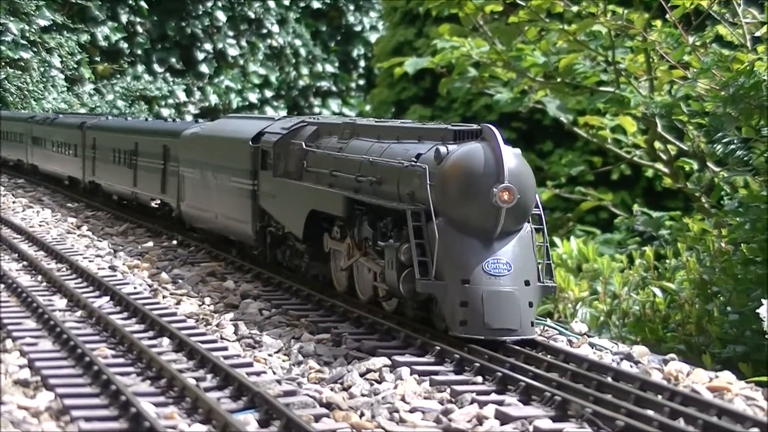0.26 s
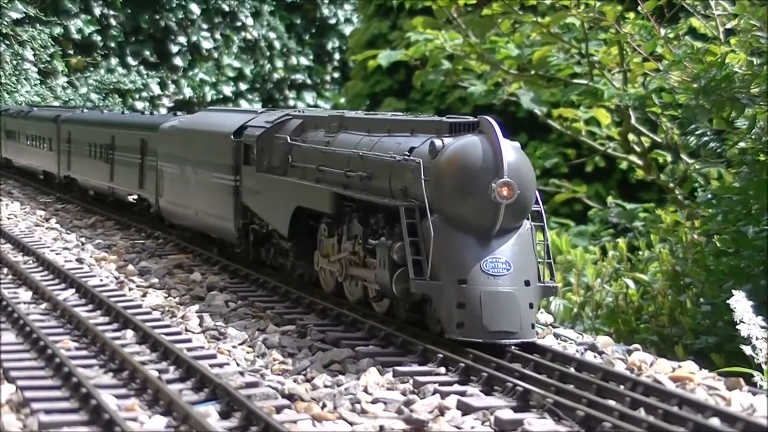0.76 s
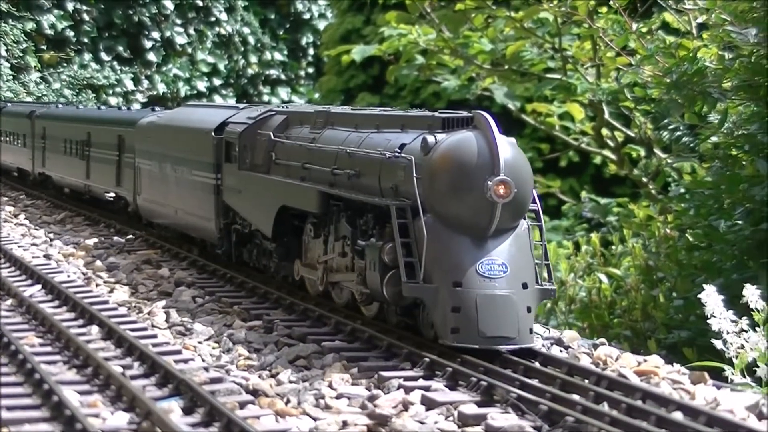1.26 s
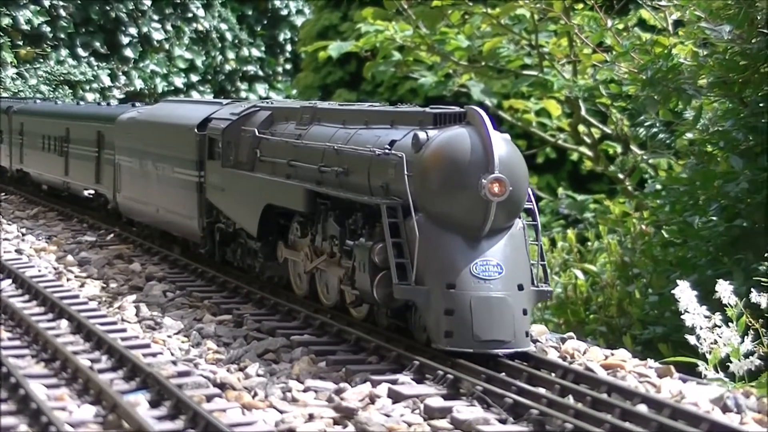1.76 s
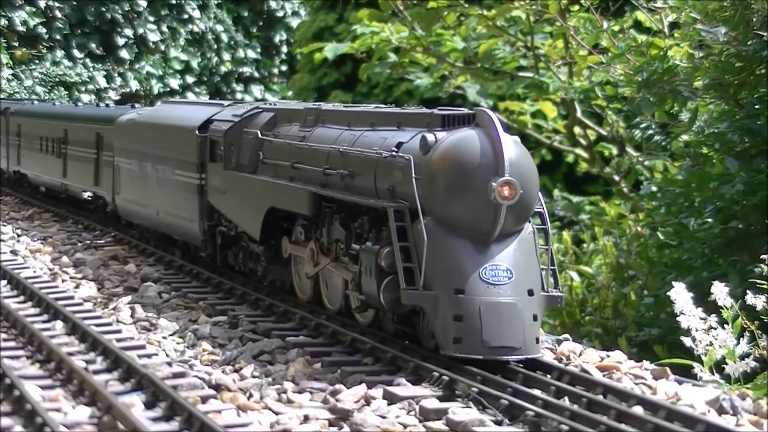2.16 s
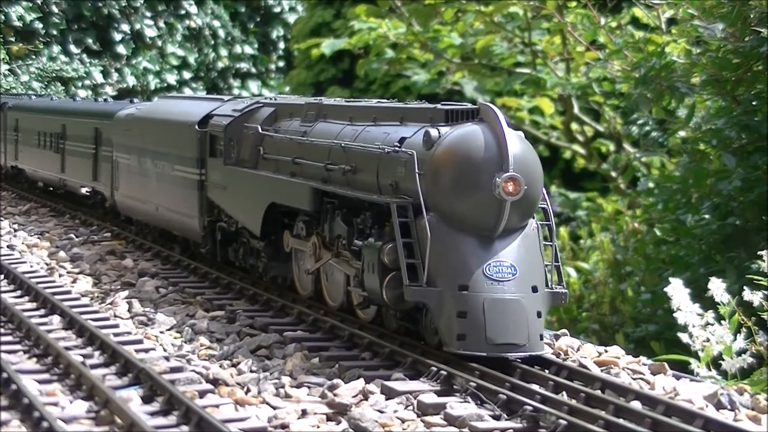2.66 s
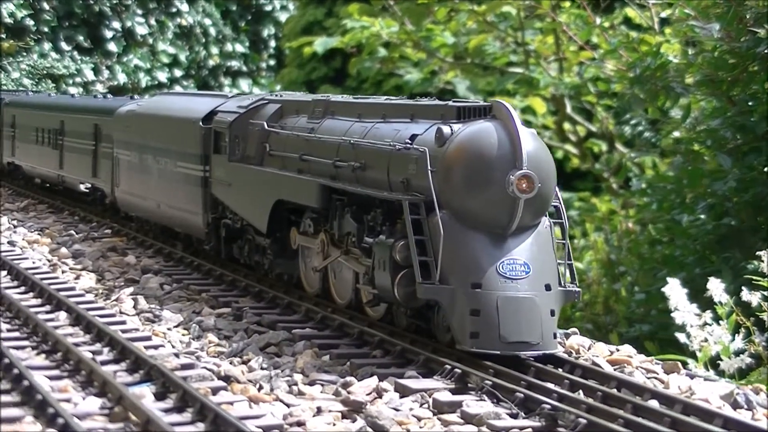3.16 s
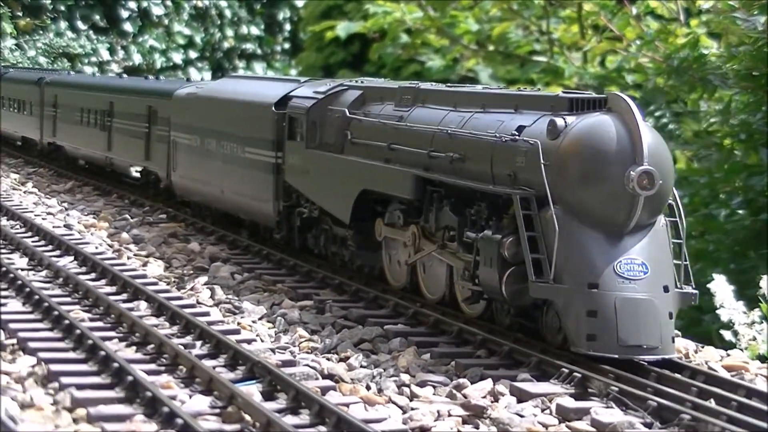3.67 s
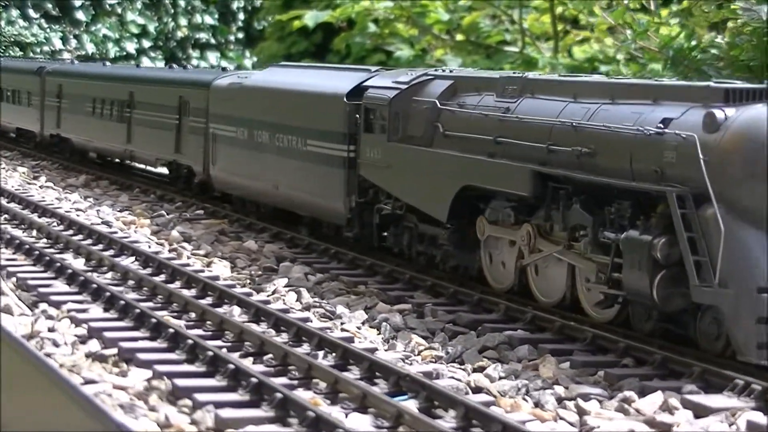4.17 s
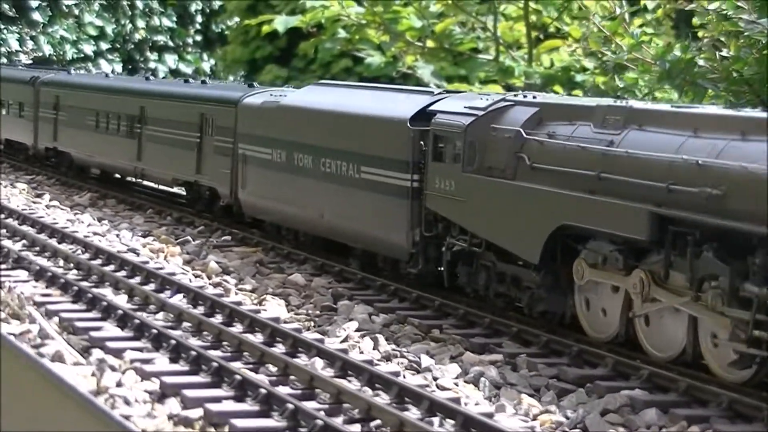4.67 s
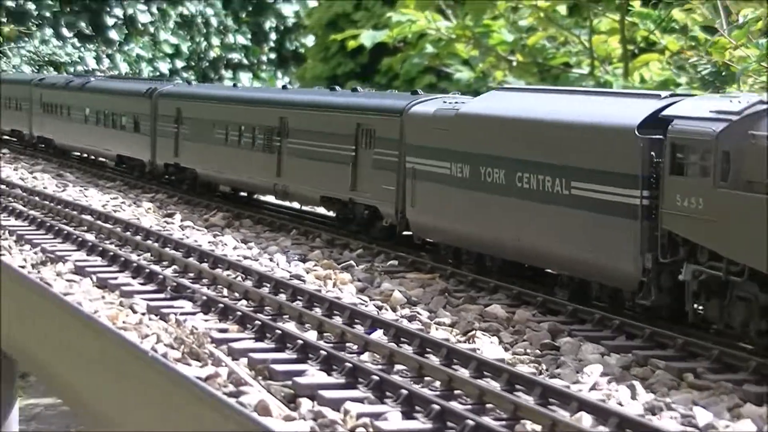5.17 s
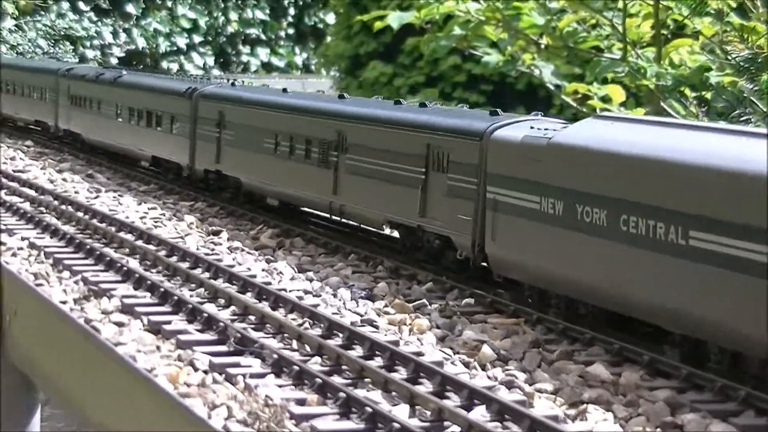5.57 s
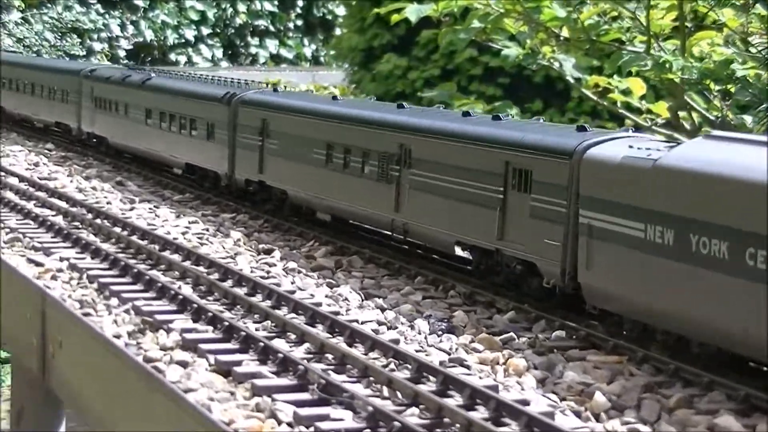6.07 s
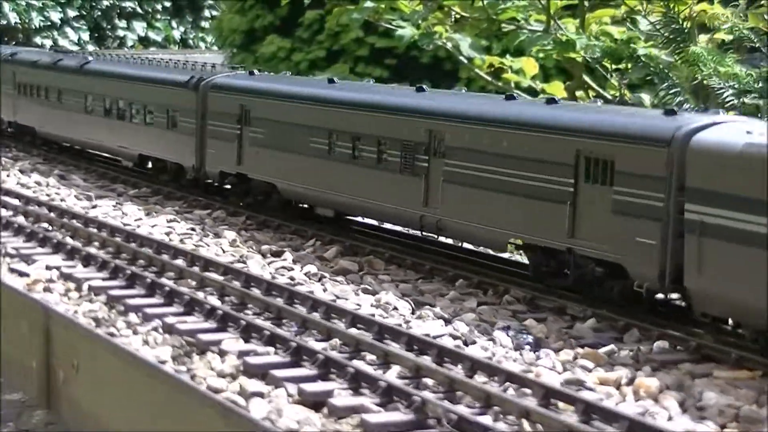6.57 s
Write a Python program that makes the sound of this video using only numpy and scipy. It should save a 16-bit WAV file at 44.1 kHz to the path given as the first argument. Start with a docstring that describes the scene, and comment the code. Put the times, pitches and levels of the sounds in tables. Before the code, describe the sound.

A small model steam train starts off in a quiet garden. Its puffs are short, high, noisy chirps with a rasp beneath, sparse at first, then quick and almost regular. Wheels hiss faintly on the rails, and light metallic ticks and dull taps grow more frequent as the cars pass close to the microphone. One brief grainy metal scrape comes near the end, over very faint distant traffic.

```python
"""Garden railway on a summer day

A model steam engine puffs out a quickening run of high chirps: noise ringing in narrow bands, with a low rasp.
Its train creeps off and rolls past: wheels hiss as shaped noise and tick over joints as short dying tones.
A part scrapes once, as a row of grainy jolts. Far traffic hums in low noise bands over a faint hiss of air.
Soft thumps are short low waves, a hollow knock rattles; faint far whistles and a thin whine are wavering tones."""
import sys
import numpy as np
from scipy import signal
from scipy.io import wavfile

SR = 44100
rng = np.random.default_rng(int(sys.argv[2]) if len(sys.argv) > 2 else 0)


def master_out(mix):
    """Clip the mix to full scale and print it as 16-bit PCM to the path in sys.argv[1]."""
    frames = np.transpose(np.atleast_2d(mix))
    ceiling = np.clip(frames, -1, 1)
    pcm = np.round(ceiling * 32767).astype(np.int16)
    wavfile.write(sys.argv[1], SR, pcm)


N = 300321

# Tones in which wheel and rail ring: (pitch [Hz], level against the strike [dB], time to fall by 60 dB [s])
RAIL_MODES = [(1490, 0.5, 0.041), (1837, 0, 0.03), (2664, 7, 0.017), (3017, 2, 0.036), (3400, 4, 0.014)]


def from_db(db):
    """Decibels to gain."""
    return 10 ** (np.asarray(db) / 20)


def rms_one(x):
    """Scale to an rms (average strength) of 1."""
    return x / np.sqrt(np.mean(x ** 2) + 1e-20)


def in_time(rows):
    """Columns of a curve at every sample."""
    s, *columns = np.transpose(rows)
    return [np.interp(np.arange(N) / SR, s, column) for column in columns]


def at_hz(points, hz):
    """Read a spectrum on a log-frequency axis."""
    points_hz, level_db = np.transpose(points)
    return np.interp(np.log(hz), np.log(points_hz), level_db)


def drift(rate_hz, size=N):
    """Random wandering of spread 1: noise smoothed twice at a 20 times lower sample rate, then stretched."""
    r = np.exp(-2 * np.pi * rate_hz * 20 / SR)
    noise = rng.standard_normal(size // 20 + 2002)
    slow = signal.lfilter([1], [1, -2 * r, r * r], noise)[2000:]   # skip the filter's start
    return np.interp(np.arange(size) / 20, np.arange(len(slow)), rms_one(slow))


def resonance(x, hz, width_hz):
    """A two-pole resonance: it favours sound near one pitch, with a gain of about 1 there."""
    r = np.exp(-np.pi * width_hz / SR)
    top = np.array([1, 0, -1]) * (1 - r * r) / 2
    return signal.lfilter(top, [1, -2 * r * np.cos(2 * np.pi * hz / SR), r * r], x)


def rings(x, table, spread_db):
    """Side-by-side double resonances (Hz, width Hz, dB), each louder or softer by chance; rms 1."""
    chance_db = spread_db * rng.standard_normal(len(table))
    total = 0
    for luck_db, (hz, width_hz, level_db) in zip(chance_db, table):
        twice = resonance(resonance(x, hz, width_hz), hz, width_hz)
        total = total + from_db(level_db + luck_db) * twice
    return rms_one(total)


def ring(hz, t60):
    """A dying sine with a soft start of 1.5 ms; it falls by 60 dB in t60 seconds."""
    t = np.arange(int(t60 * SR)) / SR
    return np.minimum(t / 0.0015, 1) * from_db(-60 * t / t60) * np.sin(2 * np.pi * hz * t)


def swell(t, lead, rise, held, t60):
    """An envelope that starts lead s early, rises smoothly, holds, then dies away."""
    up = np.clip((t + lead) / rise, 0, 1)
    dying = np.maximum(t + lead - rise - held, 0)
    return np.sin(np.pi / 2 * up) ** 2 * from_db(-60 * dying / t60)


def played(x, envelope):
    """Noise under an envelope, scaled to carry just the energy of the envelope."""
    return rms_one(x * envelope) * np.sqrt(np.mean(envelope ** 2))


def add(out, s, sound):
    """Mix a sound in from time s on; what falls outside is lost."""
    i = round(s * SR)
    sound = sound[..., max(-i, 0):N - i]
    out[..., max(i, 0):max(i, 0) + sound.shape[-1]] += sound


def both_ears(size, alike, flutter_db, flutter_hz, grain_db):
    """Stereo noise of uneven grains, with a given likeness of both channels and a fast uneven flutter."""
    grains_db = grain_db * np.minimum(rng.exponential(1, size), 5)
    level_db = flutter_db * drift(flutter_hz, size=size) + grains_db
    mid, side = rng.standard_normal((2, size)) * from_db(level_db)
    alike = np.clip(alike, 0, 1)
    return mid + np.sqrt((1 - alike) / (1 + alike)) * side * [[1], [-1]]


def banded_noise(spectrum, patchy_db):
    """Bands of stereo noise about a third-octave wide, each with its level, flicker and likeness; rms 1."""
    # How alike left and right are: (pitch [Hz], likeness [0 to 1])
    likeness = [(30, .95), (60, 0.88), (250, 0.4), (1400, 0.57), (4000, 0.62), (9000, 0.053), (15000, 0.41)]
    low_end, high_end = spectrum[0][0], spectrum[-1][0]
    edges = np.geomspace(low_end, high_end, int(3 * np.log2(high_end / low_end)))
    out, together, white = 0, drift(0.98), rng.standard_normal((2, 2, N))
    for k, (low, high) in enumerate(zip(edges, edges[1:])):
        band = signal.butter(2, [low, high], "band", fs=SR, output="sos")
        mid, side = signal.sosfilt(band, white[k % 2])   # neighbouring bands use different noise
        hz = np.sqrt(low * high)
        alike = np.clip(at_hz(likeness, hz), -1, 1)
        flicker_db = patchy_db * (0.71 * together + drift(10.3))
        gain = from_db(at_hz(spectrum, hz) + flicker_db)
        out = out + gain * (np.sqrt(1 + alike) * mid + np.sqrt(1 - alike) * side * [[1], [-1]])
    return rms_one(out)


def open_air():
    """Faint steady hiss of the open air: shaped noise with a flicker in each band."""
    # Spectrum: (pitch [Hz], relative level [dB])
    air_colour = [(1000, -15), (2000, 3), (4000, -42), (8000, 1.5), (11000, -3), (15700, -5)]
    return from_db(-65) * banded_noise(air_colour, patchy_db=1.5)


def traffic_hum():
    """Far traffic: low noise bands, louder at first and soon settling."""
    # Spectrum: (pitch [Hz], relative level [dB])
    hum_colour = [(15, -49), (25, -10), (54, -5.5), (169, 0), (205, 1), (386, -3), (579, -12), (738, -12),
                  (1200, -16.5), (1560, -45), (2640, -120)]
    steady_db, start_extra_db, settles_s = -65, 11, 0.15
    left_to_settle = np.clip(1 - np.arange(N) / SR / settles_s, 0, 1)
    return from_db(steady_db + start_extra_db * left_to_settle) * banded_noise(hum_colour, patchy_db=0.97)


def whine():
    """Two close thin tones that waver a little and slowly grow stronger."""
    # Tones: (pitch [Hz], level before swell and waver [dB rms])
    tones = [(7800, -78.5), (7825, -79)]
    # Slow growth: (time [s], level [dB])
    growth = [(0, -2), (3.5, -0.5), (6.81, 0)]
    t, out = np.arange(N) / SR, 0
    growth_db, = in_time(growth)
    for hz, level_db in tones:
        swing_db = 0.8 * drift(4.0)
        wobble = 0.3 * drift(3.0)   # radians
        gain = np.sqrt(2) * from_db(level_db + swing_db + growth_db)
        out = out + gain * np.sin(2 * np.pi * hz * t + wobble)
    return out


def whistles():
    """Faint far whistles: thin gliding tones that fade in and out and waver in level and phase."""
    # (start [s], end [s], start pitch [Hz], end pitch [Hz], level before fade and waver [dB rms])
    calls = [(.68, 0.796, 2170, 2130, -72), (1.182, 1.378, 2290, 2080, -69.5),
             (1.42, 1.575, 2490, 2420, -70), (1.595, 1.63, 2440, 2480, -68),
             (4.04, 4.193, 3200, 3150, -66.5), (4.404, 4.433, 2180, 2150, -58),
             (5.355, 5.398, 1067, 1160, -68), (5.672, 5.71, 2750, 2660, -62), (6.668, 6.8, 2710, 2690, -69)]
    out = np.zeros(N)
    for start, end, start_hz, end_hz, level_db in calls:
        size = int((end - start) * SR)
        phase = 2 * np.pi * np.cumsum(np.linspace(start_hz, end_hz, size)) / SR
        phase = phase + 0.6 * drift(30.0, size=size)
        waver_db = 3.0 * drift(25.0, size=size)
        fade = np.hanning(size) ** 0.14   # nearly flat, with short ends
        add(out, start, np.sqrt(2) * from_db(level_db + waver_db) * fade * np.sin(phase))
    return out


def thumps():
    """Soft low pushes at the microphone: each a smooth wave of about two cycles."""
    # (time [s], peak level [dB], pitch [Hz])
    pushes = [(1.868, -58, 60.3), (2.65, -51.5, 81), (3.329, -62, 82), (3.425, -54, 51), (3.95, -52, 62),
              (4.413, -51, 82.4), (4.941, -54.5, 81.4), (6.256, -53, 94.5), (6.359, -60, 60.7)]
    out = np.zeros(N)
    for s, peak_db, hz in pushes:
        t = np.arange(int(1.9 / hz * SR)) / SR
        add(out, s, from_db(peak_db) * np.hanning(len(t)) * np.cos(2 * np.pi * hz * (t - t[-1] / 2)))
    return out


def knock():
    """A hollow knock: noise rattles on in several resonances that die at their own speeds."""
    # (time [s], level [dB])
    blows = [(0.182, -45.5)]
    # Resonances: (pitch [Hz], relative level [dB], time to fall by about 18 dB [s])
    modes = [(141, -7, 0.49), (234, -9.5, 0.53), (300, -1.5, 0.15), (385, -1, 0.042), (480, 0, 0.053),
             (556, -10, 0.069), (960, -25, 0.05)]
    out, t = np.zeros(N), np.arange(int(0.3 * SR)) / SR
    for s, blow_db in blows:
        for hz, level_db, fall_s in modes:
            rattle = rms_one(resonance(rng.standard_normal(len(t)), hz, 29)) * np.minimum(t / 0.0045, 1)
            add(out, s, from_db(blow_db + level_db - 5.0 - 60 * t / (3.3 * fall_s)) * rattle)
    return out


def wheel_hiss():
    """Wheels rolling on the rails: shaped noise whose level follows the run and flickers fast."""
    # Level before a lift of 1 dB: (time [s], level [dB])
    rolling = [(0.0, -62.5), (0.39, -63.5), (0.42, -58.5), (0.5, -62.5), (1.48, -62.5), (1.75, -65.5),
               (2.07, -62.5), (3.07, -62), (3.24, -59.5), (3.75, -60), (4.15, -61), (4.55, -55.5),
               (5.28, -56), (5.42, -54.5), (5.9, -53), (6.05, -54.5), (6.31, -57.5), (6.81, -59)]
    # Spectrum: (pitch [Hz], relative level [dB])
    roll_colour = [(290, -14), (500, -22), (1180, -17.5), (1490, -10), (1730, -13), (2280, -5.5),
                   (3390, -4), (4310, -3.5), (4990, -5), (5400, -5), (6680, -11), (12000, -24.5),
                   (15600, -58), (22000, -120)]
    rolling_db, = in_time(rolling)
    return from_db(rolling_db + 1.0 + 1.15 * drift(300.0)) * banded_noise(roll_colour, patchy_db=1.4)


def wash():
    """A coarser, lower hiss as the cars pass: grainy noise in broad rings swells and fades."""
    # (time [s], level [dB])
    passing = [(5.27, -69), (5.36, -54), (5.6, -54), (5.88, -55.5), (5.95, -66), (6.06, -76)]
    # Rings: (pitch [Hz], width of each resonance pass [Hz], relative level [dB])
    broad_rings = [(603, 370, -11), (1590, 470, -8), (2290, 570, 1), (2870, 490, 3.5), (3800, 1500, 2),
                   (7150, 3100, -16)]
    s, level_db = np.transpose(passing)
    t = np.arange(s[0], s[-1], 1 / SR)
    noise = both_ears(len(t), alike=1.0, flutter_db=0.0, flutter_hz=120, grain_db=4.0)
    noise = noise * from_db(1.5 * drift(13.0, size=len(t)))
    out = np.zeros((2, N))
    add(out, s[0], from_db(np.interp(t, s, level_db)) * rings(noise, broad_rings, 0))
    return out


def wheel_ticks():
    """Wheels tick over joints: rail tones, each struck with a chance strength, under a short noisy crack."""
    # (time [s], strike level of the rail tones [dB], crack level [dB], crack pitch [Hz])
    joints = [(0.994, -68, -51, 4450), (1.4537, -72, -49.5, 2000), (1.933, -42.5, -45, 3000),
              (1.983, -55, -63, 3000), (3.7255, -51, -41, 4300), (3.914, -49, -45, 3300),
              (4.297, -69, -47, 2300), (4.3007, -60, -52, 7460), (4.677, -57, -50, 3500),
              (4.9472, -53, -39.5, 3920), (5.083, -59, -37, 4960), (5.254, -47, -46, 4300),
              (5.431, -56, -48, 1700), (5.564, -63, -51, 1200), (5.756, -68, -58, 1600),
              (5.888, -62, -44, 3220), (5.905, -64, -46, 2800), (5.939, -58, -60, 1500)]
    out, t = np.zeros(N), np.arange(500) / SR
    for s, strike_db, crack_db, crack_hz in joints:
        for hz, level_db, t60 in RAIL_MODES:
            add(out, s, from_db(strike_db + level_db + 1.5 * rng.standard_normal()) * ring(hz, t60))
        crack = rings(rng.standard_normal(len(t)), [(crack_hz, 0.44 * crack_hz, 0)], 0)
        add(out, s, from_db(crack_db - 60 * t / 0.018) * crack)
    return out


def rail_pings():
    """Faint pings of the lowest rail tone alone."""
    # (time [s], level [dB])
    pings = [(2.0602, -58), (2.258, -56), (2.6579, -57), (3.0205, -65), (3.1, -58), (3.1797, -58),
             (3.9988, -56), (4.118, -57)]
    out = np.zeros(N)
    hz, _, t60 = RAIL_MODES[0]
    for s, level_db in pings:
        add(out, s, from_db(level_db) * ring(hz, t60))
    return out


def dull_taps():
    """Dull taps: very short dying tones roughened by noise."""
    # (time [s], level before soft start and roughness [dB], pitch [Hz])
    taps = [(4.394, -36, 830), (4.9462, -41.5, 696), (5.5623, -31.5, 570), (5.756, -40.5, 700),
            (5.868, -41, 442)]
    out = np.zeros(N)
    for s, level_db, hz in taps:
        tone = ring(hz, 0.006)
        add(out, s, from_db(level_db) * tone * (1 + 0.6 * rng.standard_normal(len(tone))))
    return out


def scrape():
    """Metal jolts over metal: bursts of grains excite rings, soon damped; a rough hollow note ends it."""
    # Jolts: (time [s], level [dB])
    jolt_table = [(6.08, -41), (6.086, -43.5), (6.094, -41), (6.1, -42), (6.107, -37.5), (6.114, -43.5),
                  (6.12, -38.5), (6.129, -40.5), (6.139, -43), (6.148, -46)]
    # Rings: (pitch [Hz], width of each resonance pass [Hz], relative level [dB])
    metal_rings = [(370, 160, -15), (940, 220, -15.5), (1470, 520, -17), (2080, 320, -2.5),
                   (3440, 1800, -7.5), (4180, 130, 5), (4420, 80, -1), (4660, 100, 7), (4740, 200, -5),
                   (5570, 920, -10), (8900, 2500, -16), (11600, 4100, -27.5)]
    # Hollow note: (start [s], length [s], pitch [Hz], level before its envelope [dB])
    hollow_note = (6.114, .034, 425, -52)
    damp_s, damp_db, jolt_t60 = 6.134, -8, 0.038
    t, out = np.arange(jolt_table[0][0], jolt_table[-1][0] + 0.035, 1 / SR), np.zeros((2, N))
    jolts = sum(swell(t - s, 0, 0.00094, 0.003, jolt_t60) * from_db(level_db) for s, level_db in jolt_table)
    grains = both_ears(len(t), alike=0.93, flutter_db=1.0, flutter_hz=300, grain_db=2.5)
    damped = from_db(damp_db * np.clip((t - damp_s) / 0.001, 0, 1))
    add(out, t[0], damped * rings(grains * jolts, metal_rings, 0) * np.sqrt(np.mean(jolts ** 2)))
    start, length, hz, level_db = hollow_note
    size = int(length * SR)
    rough = rings(rng.standard_normal(2 * size), [(hz, 30, 0)], 0)[size:]   # the ring has built up by then
    add(out, start, from_db(level_db) * played(rough, np.hanning(size)))
    return out


def chirps():
    """Engine puffs: noise in narrow rings; a low rasp starts first, the main ring shifts pitch and lingers."""
    # (time [s], main ring level [dB], first ring [Hz], later ring [Hz], lingering ring [Hz],
    #  upper ring [Hz], low rasp level against the ring [dB], basic holding time [s])
    puffs = [(0.0, -53, 5260, 5240, 5350, 6800, -8, 0.0082),
             (0.22, -45, 5500, 5450, 5480, 7040, -10, 0.015),
             (0.737, -48, 5380, 5450, 5360, 7050, -9, 0.056),
             (1.025, -45.5, 5470, 5280, 5300, 6930, -5.5, 0.066),
             (1.312, -42.5, 5460, 5354, 5440, 7300, -3.5, 0.028),
             (1.603, -42.5, 5560, 5330, 5460, 6950, -7, 0.031),
             (1.905, -43, 5520, 5330, 5440, 7230, -4, 0.017),
             (1.956, -41.5, 5440, 5420, 5410, 7140, -17, 0.024),
             (2.185, -39.5, 5470, 5210, 5350, 7330, -7, 0.029),
             (2.4, -39, 5350, 5330, 5450, 7100, -8, 0.04), (2.497, -47, 5470, 5610, 5400, 7140, -27, 0.01),
             (2.618, -41.5, 5440, 5285, 5350, 7240, -5.5, 0.031),
             (2.764, -44.5, 5450, 5480, 5570, 7100, -10, 0.03),
             (2.84, -43, 5370, 5200, 5310, 7260, -4.5, 0.038),
             (3.063, -42, 5350, 5430, 5390, 7200, -4, 0.036),
             (3.305, -42, 5440, 5160, 5400, 7170, -4.5, 0.017),
             (3.446, -45, 5420, 5430, 5450, 7040, -10, 0.037),
             (3.539, -42.5, 5400, 5190, 5230, 7200, -4, 0.041),
             (3.756, -43, 5310, 5205, 5120, 7000, -4, 0.048),
             (3.972, -41, 5500, 5500, 5320, 7430, -8, 0.03),
             (4.202, -44.5, 5470, 5140, 5050, 7340, -4.5, 0.037),
             (4.353, -44.5, 5460, 5560, 5380, 6740, -15, 0.024),
             (4.423, -43.5, 5400, 5240, 5170, 7400, -5, 0.048),
             (4.613, -42, 5840, 5330, 5320, 7050, -14, 0.017),
             (4.876, -48, 5700, 5290, 5180, 6500, -10, 0.038),
             (5.144, -48, 5300, 5350, 5200, 6800, -6, 0.052),
             (5.219, -42, 5250, 5140, 5200, 6600, -5, 0.018),
             (5.393, -49, 5540, 5450, 5440, 7060, -5.5, 0.039),
             (5.485, -41, 5320, 5280, 5380, 7240, -7.5, 0.023),
             (5.65, -45, 5580, 5430, 5560, 7300, -21, 0.047),
             (5.724, -43, 5640, 5220, 5260, 7240, -4.5, 0.033),
             (5.925, -43, 5360, 5190, 5250, 7100, -4.5, 0.036),
             (6.158, -41.5, 5360, 5176, 5080, 7200, -6, 0.042),
             (6.37, -42, 5560, 5350, 5520, 7350, -8.5, 0.029),
             (6.583, -41.5, 5300, 5466, 5320, 7450, -11, 0.03),
             (6.682, -43.5, 5350, 5340, 5300, 6950, -10.5, 0.012)]
    # Rasp rings: (pitch [Hz], width of each resonance pass [Hz], relative level [dB])
    rasp_rings = [(3680, 280, -18.5), (4027, 700, -5.5), (4100, 115, -7), (4240, 74, 1.5), (4460, 70, 1),
                  (4670, 124, 0.5)]
    # Stereo balance of the engine: (time [s], left over right [dB])
    engine_pan = [(0, -.8), (1.5, 0), (4.5, 0.5), (5.2, .3), (6.81, 0)]
    t60 = 0.31   # basic time to fall by 60 dB [s]; each layer takes its own share
    out, t = np.zeros((2, N)), np.arange(-0.05, 0.5, 1 / SR)
    for s, ring_db, first_hz, later_hz, tail_hz, upper_hz, rasp_db, held in puffs:
        luck = rng.standard_normal(5)
        base_width_hz = 163 if rasp_db < -8.5 else 310   # clear or harsh chirp
        width_hz = base_width_hz * (1 + 0.18 * s)        # rings broaden as the run goes on
        # Side and upper rings follow only part of a chirp's swing about -46 dB
        lag_db = 0.11 * (ring_db + 46)
        side_hz, side_db = 5790 + 160 * luck[0], -8.5 + luck[1] - lag_db
        upper_db = -14.5 + 3.5 * luck[2] - lag_db
        low_hz, low_db = 2085 + 41 * luck[4], -21.5 + 2.0 * luck[3]
        air = both_ears(len(t), alike=0.7, flutter_db=0.24, flutter_hz=252, grain_db=1.5)

        def stutter():
            """Each narrow ring breaks up by itself."""
            return from_db(1.0 * drift(35, size=len(t)))

        def one(hz, width_hz):
            """The puff's noise in a single ring."""
            return rings(air, [(hz, width_hz, 0)], 0)

        def layer(level_db, noise, lead, rise, held_s, fall_s):
            """One part of the chirp under its own envelope."""
            return from_db(level_db) * played(noise, swell(t, lead, rise, held_s, fall_s))

        # Weight moves from the first ring to the later one
        shift = 0.49 + 0.4 * np.clip((t - 0.015) / 0.013, 0, 1)
        first = np.cos(shift) * one(first_hz, 0.56 * width_hz)
        later = np.sin(shift) * one(later_hz, 0.22 * width_hz) * stutter()
        sound = layer(0, first + later, 0.011, 0.009 + 0.22 * held, 0.9 * held, t60)
        # A broad ring under the main one, then the lingering ring
        sound += layer(-7.0, one(5280, 620), 0.016, 0.0085, 0.64 * held, 1.25 * t60)
        sound += layer(-20, one(tail_hz, 110) * stutter(), 0, 0.043, held, 8.5 * t60)
        sound += layer(side_db, one(side_hz, 270), 0.024, 0.023, 0.35 * held, 1.2 * t60)
        sound += layer(rasp_db, rings(air, rasp_rings, 2.0), 0.028, 0.024, 0.83 * held, 1.12 * t60)
        sound += layer(upper_db, one(upper_hz, 0.83 * width_hz), 0.0029, 0.0092, held, 1.13 * t60)
        sound += layer(low_db, one(low_hz, 220) * stutter(), 0.031, 0.008, 0.65 * held, 0.89 * t60)
        # Short airy top
        sound += layer(-27.5, one(12300, 3800), 0.0093, 0.029, 0.37 * held, 0.052 * t60)
        add(out, s + t[0], from_db(ring_db) * sound)
    return out * from_db(in_time(engine_pan)[0] * [[0.5], [-0.5]])


def scene():
    """All sources in the open air."""
    background = open_air() + traffic_hum() + whine() + whistles() + thumps() + knock()
    train = wheel_hiss() + wash() + wheel_ticks() + rail_pings() + dull_taps() + scrape()
    return background + train + chirps()


def record(dry):
    """The microphone drops the deepest bass; the top is cut steeply."""
    thin = signal.sosfilt(signal.butter(2, 36.0, "high", fs=SR, output="sos"), dry)
    # From 16050 Hz up, everything is at least 70 dB down
    return signal.sosfilt(signal.cheby2(14, 70, 16050, fs=SR, output="sos"), thin)


dry = scene()
out = record(dry)
master_out(out)
```